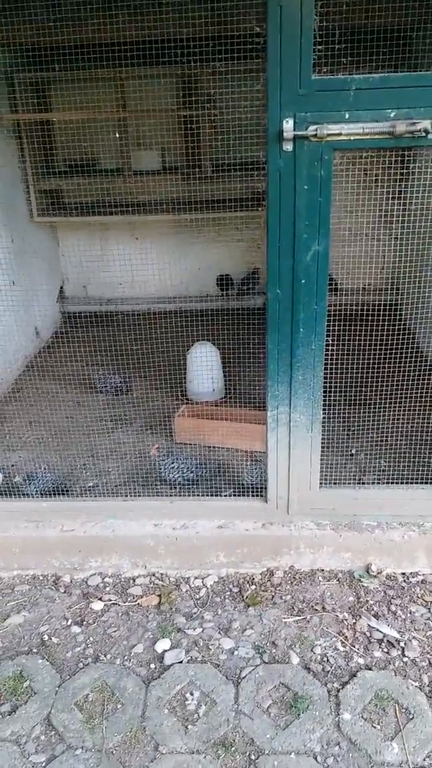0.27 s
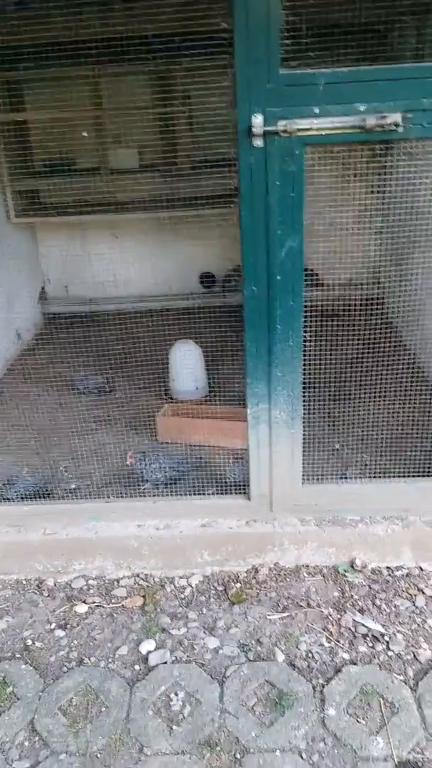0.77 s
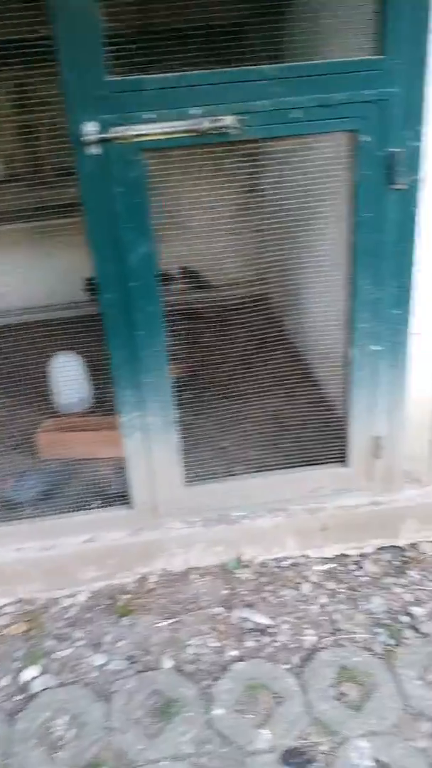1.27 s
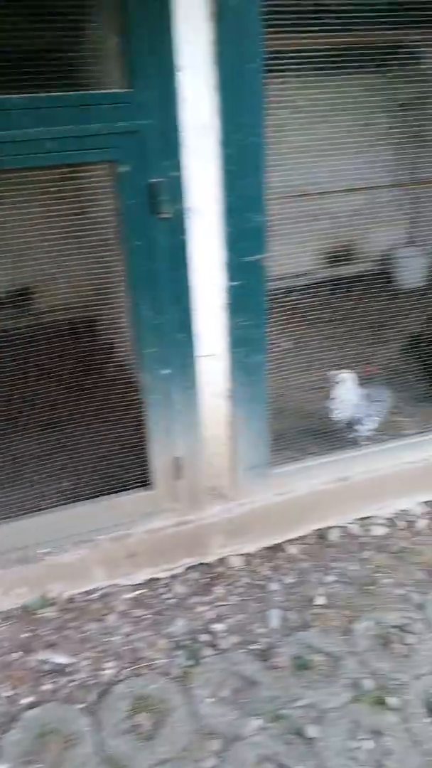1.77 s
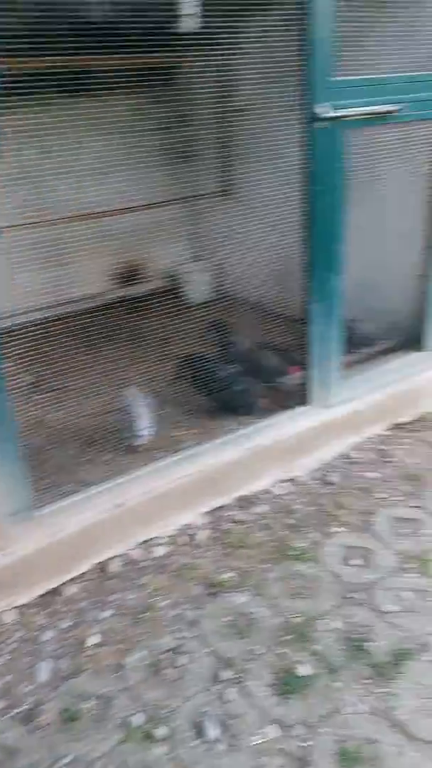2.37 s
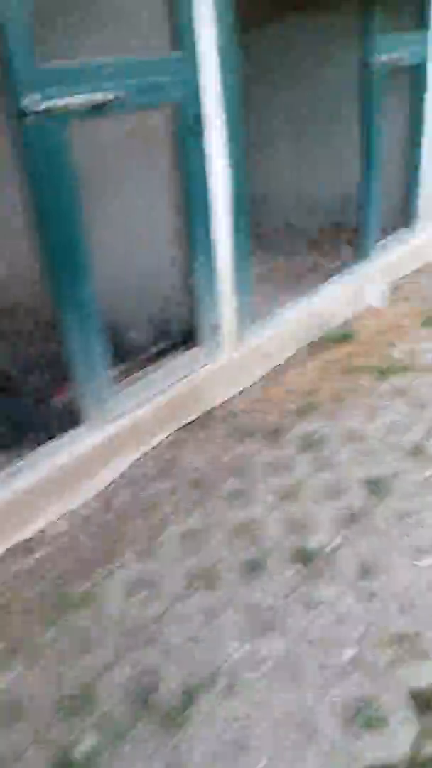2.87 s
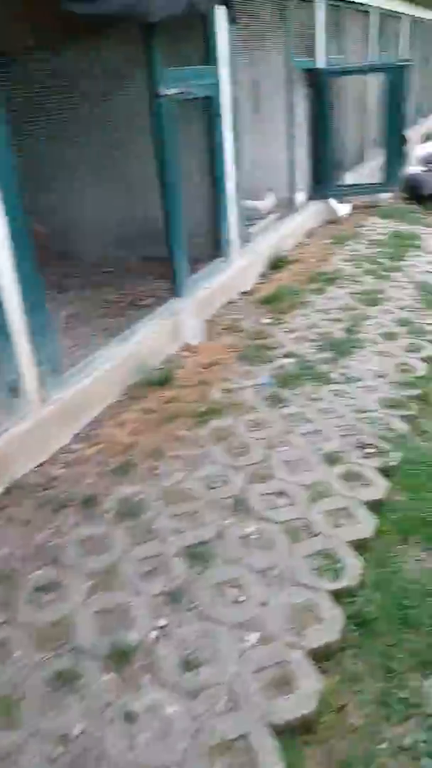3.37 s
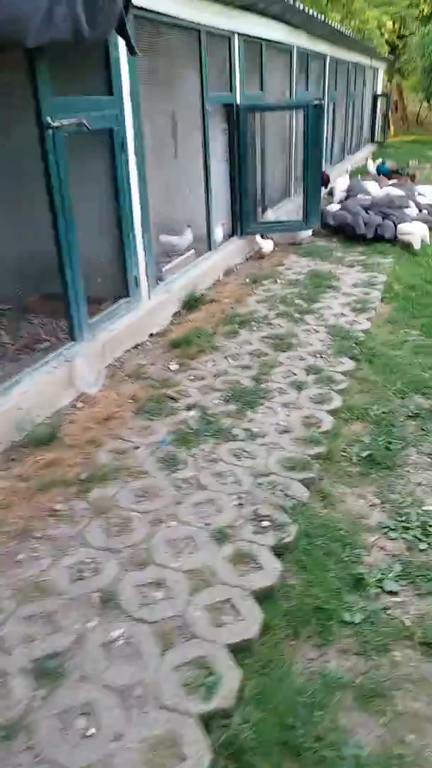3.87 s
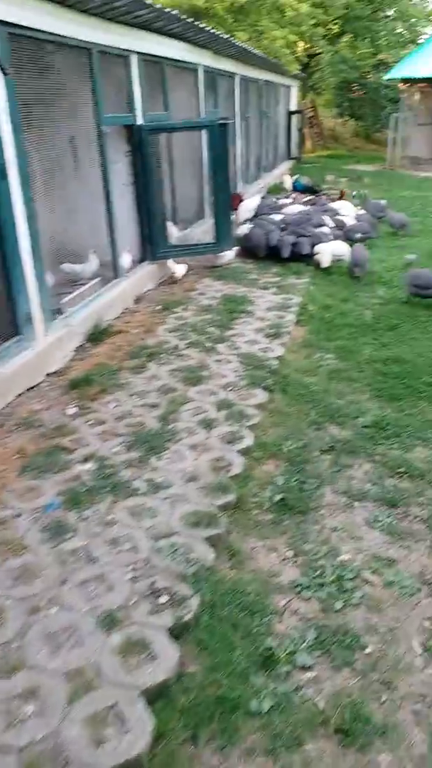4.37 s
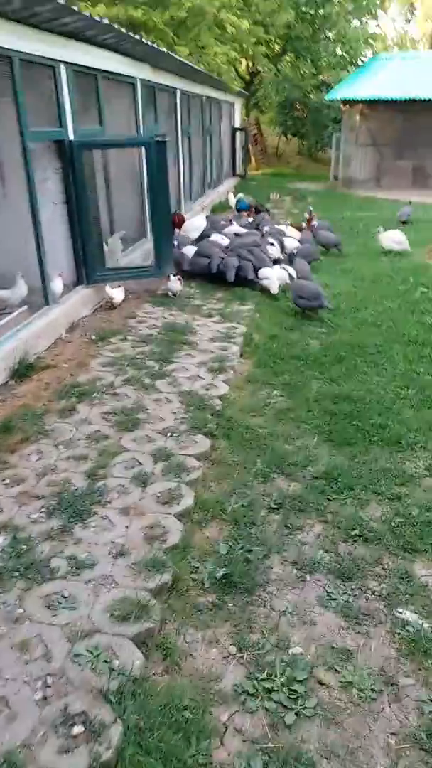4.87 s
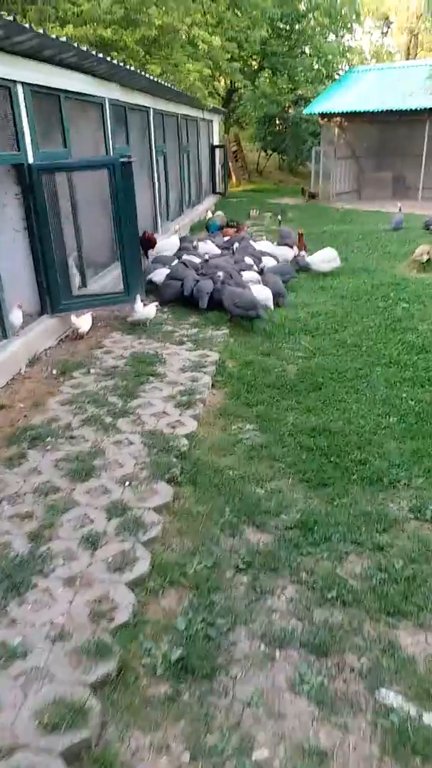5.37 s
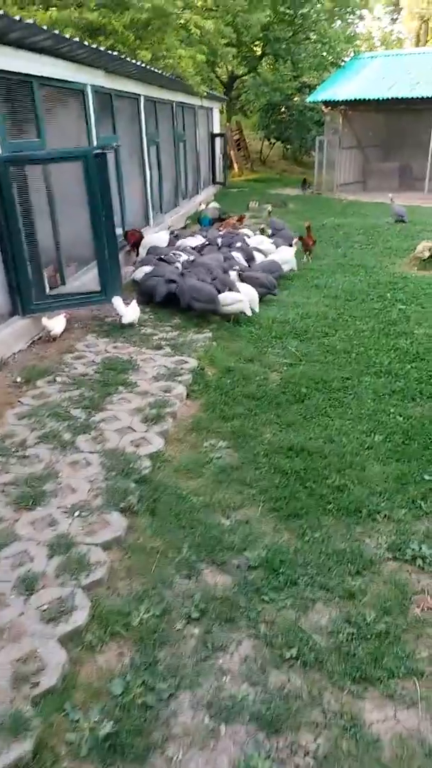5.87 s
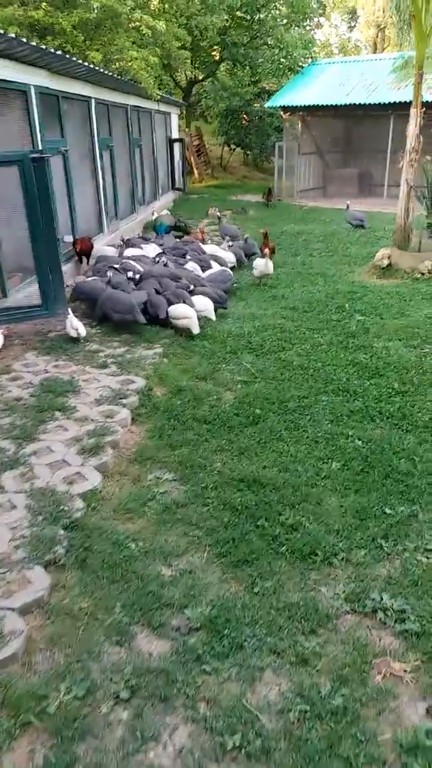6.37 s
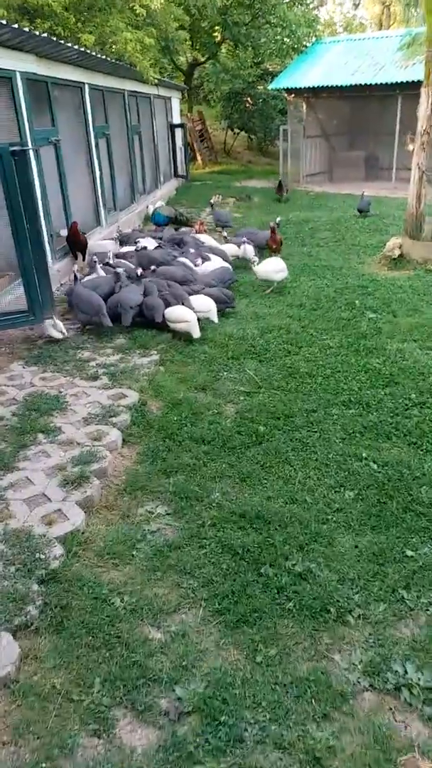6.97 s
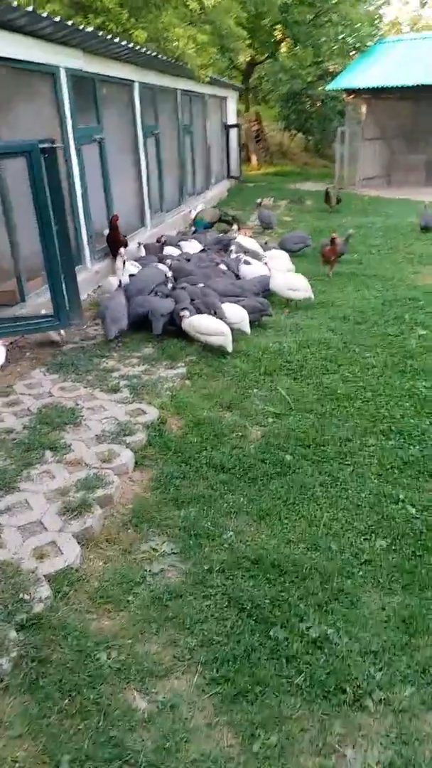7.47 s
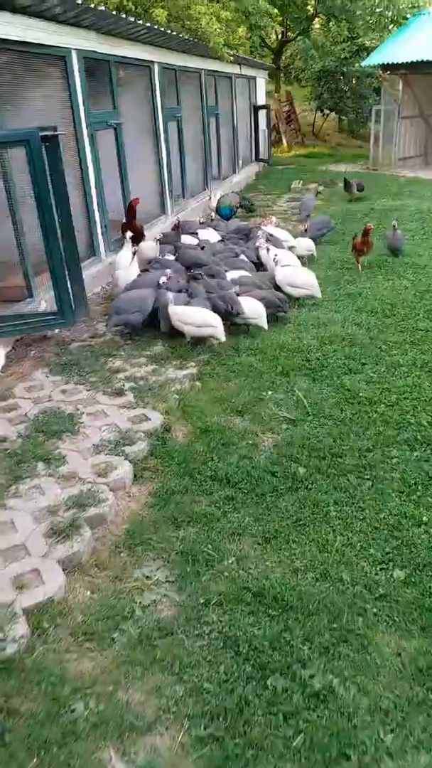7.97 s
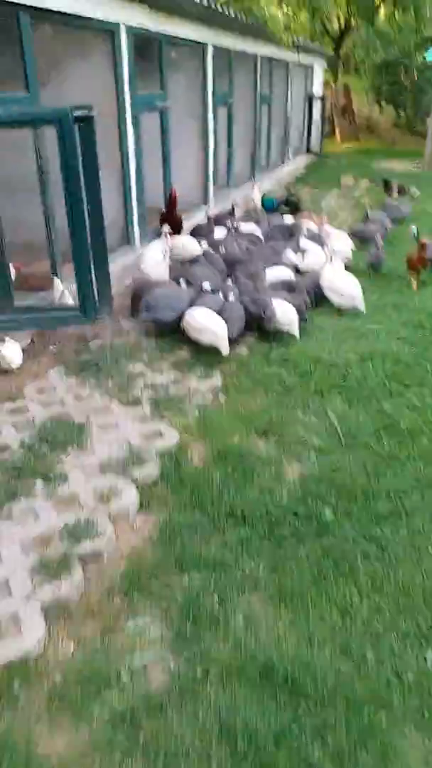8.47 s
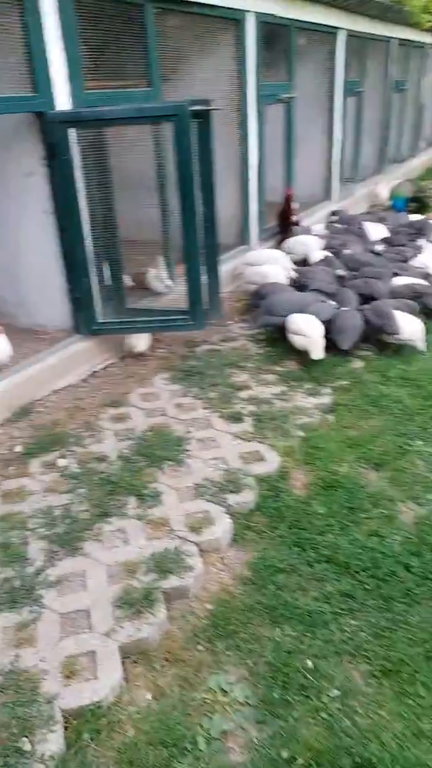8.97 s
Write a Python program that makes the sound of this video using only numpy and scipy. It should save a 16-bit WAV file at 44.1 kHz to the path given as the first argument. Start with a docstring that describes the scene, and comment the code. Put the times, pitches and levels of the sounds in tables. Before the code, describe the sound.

In a poultry yard beside walled pens, guinea fowl and chickens call over a faint, steady air hush and a fluctuating murmur of farther birds. From 0 to 1.2 s there are short bright clucks, a sharp chip near 0.4 s and dull low thuds with slight crunches. From 1.3 to 2.2 s it is sparser: chips, soft mutters, small peeps. At about 2.35 s a close bird gives a nearly pure whistle sliding upward for 0.3 s, then chips and a loud harsh squawk at 2.8-3.0 s over a clear held note. A few clucks follow, then a quieter stretch from 3.3 to 4.7 s with thin faint whines. From 5 s clucking thickens, raspy and irregular, busiest around 7.2-8 s, with chips, mutters and soft thumps, continuing to the end just past 9 s. Nearly mono handheld pickup; short wall echoes, little tail.

```python
"""A row of pens in a yard, where a mixed flock of guinea fowl and chickens clucks, rasps and chips.
Each bird is a source and filter: jittered syrinx pulses and puffs of air ring the throat resonances.
One bird close by gives a rising whistle, a nearly pure tone, then a saturated squawk over a held note.
Dull low thuds and crunchy hisses (footfalls, bumps, perhaps low clucks) are noise through filters.
Sparse random echoes from the pen walls and a faint tail answer the birds, over steady shaped air noise."""
import sys
import numpy as np
from scipy import signal
from scipy.fft import rfft, irfft, next_fast_len
from scipy.io import wavfile
from scipy.ndimage import uniform_filter1d, minimum_filter1d

SR = 44100
rng = np.random.default_rng(int(sys.argv[2]) if len(sys.argv) > 2 else 0)


def file_out(sig):
    """Save sig as 16-bit WAV at sys.argv[1]."""
    # one column per channel
    cols = np.atleast_2d(sig).T
    # limit, then scale
    lim = np.clip(cols, -1, 1)
    pcm = np.round(lim * 32767).astype(np.int16)
    wavfile.write(sys.argv[1], SR, pcm)


N = 406161  # length in samples


def amp(db):
    """Logarithmic level: converts decibels to an amplitude gain."""
    return 10 ** (np.asarray(db) / 20)


def evened(x):
    """Power normalisation: scales to unit rms."""
    return x / np.sqrt(np.mean(x ** 2) + 1e-20)


def read(points, hz):
    """Logarithmic frequency scale: interpolates a table along it."""
    f, value = np.transpose(points)
    return np.interp(np.log(hz + 1), np.log(f + 1), value)


def bins(x):
    """Discrete Fourier analysis: the frequencies in the spectrum of x."""
    return np.fft.rfftfreq(x.shape[-1], 1 / SR)


def coloured(x, points):
    """Linear filtering: multiplies the spectrum by a table of relative levels, then gives unit rms."""
    return evened(irfft(rfft(x) * amp(read(points, bins(x))), len(x)))


def resonance(x, hz, width_hz):
    """Resonance: three cascaded second-order bandpasses, each of width_hz, brought to unit rms."""
    f = bins(x) + 1
    response = 1 / (1 + 1j * (f * f - hz * hz) / (f * width_hz)) ** 3
    return evened(irfft(rfft(x) * response, len(x)))


def wander(size, hz):
    """Random modulation: noise with a Gaussian lowpass of scale hz, at unit rms."""
    x = rng.standard_normal(next_fast_len(size))
    return evened(irfft(rfft(x) * np.exp(-(bins(x) / hz) ** 2), len(x))[:size])


def add(mix, s, sound):
    """Superposition: adds a sound at a time in seconds, trimmed to the mix."""
    start = round(s * SR)
    sound = sound[max(-start, 0):]
    part = mix[max(start, 0):][:len(sound)]
    part += sound[:len(part)]


def syrinx(hz, rough, jitter=0.0465, rasp=1.0):
    """Pulsed source: jittered membrane pulses, strong and weak in turn, with air that grows in rough calls."""
    hz = hz * (1 + jitter * rough * wander(len(hz), 259))
    turns = np.cumsum(hz) / SR + rng.random()
    harmonic = np.arange(1, int(9000 / hz.mean()) + 1)[:, None]
    # random harmonic levels and phases, drawn anew for each call, smear the pulses
    size, lag = rng.standard_normal((2, 48, 1))[:, :len(harmonic)]
    pulses = (amp(3 * size) * np.cos(2 * np.pi * harmonic * turns + .9 * lag)).sum(0)
    # a half-rate modulation makes neighbouring pulses unequal
    pulses = pulses * (1 + .6 * rough * wander(len(hz), 80) * np.cos(np.pi * turns))
    puffs = (.55 + np.exp(-(turns % 1) / .3)) * rng.standard_normal(len(hz))
    share = np.clip(.12 + rasp * rough ** 2, 0, .5)
    flutter = amp((1.2 + 2.2 * rough) * wander(len(hz), 260))
    return ((1 - share) * evened(pulses) + share * evened(puffs)) * flutter


# spectrum shape of the still air: frequency_hz [Hz], relative_level_db [dB]
AIR_SPECTRUM = [(25, -29), (90, -2), (200, -11), (400, -14), (720, -29), (1020, -16), (1450, -3.5),
                (2060, -11), (2700, -3.5), (3600, -10.5), (5300, -24), (7000, -22.5), (15500, -35)]


def still_air(level_db=-63):
    """Stationary noise: a steady random hush with a fixed spectrum."""
    return amp(level_db) * coloured(rng.standard_normal(N), AIR_SPECTRUM)


# murmur of the birds farther off: time_s [s], level_db [dB, before the overall trim]
FLOCK_LEVEL = [(0, -37), (.4, -44.5), (.7, -57.5), (1.2, -50), (1.95, -60.5), (2.4, -44.5), (3.1, -41),
               (3.35, -61), (4.251, -51.5), (4.6, -75), (4.9, -44.5), (5.25, -53), (5.7, -48.5), (7.1, -48),
               (7.7, -39.5), (8.1, -52), (8.7, -44.5), (9.21, -60)]
# spectrum shape of the murmur: frequency_hz [Hz], relative_level_db [dB]
FLOCK_SPECTRUM = [(60, -44.5), (300, -14.5), (600, -21), (1000, -6.5), (1500, 1), (2000, -1.5),
                  (2800, -0.5), (4000, -10), (5200, -19.5), (8000, -34.5), (15000, -30.5)]


def flock(count=260, trim_db=-1.5):
    """Superposition of many sources: overlapping small calls merge into a murmur from birds farther off."""
    out = np.zeros(N)
    for k, (when, length, pitch, glide, rough, size) in enumerate(rng.random((count, 6))):
        swell = np.hanning(int((.03 + .06 * length) * SR))
        slide = .3 * (glide - .5) * np.linspace(0, 1, len(swell))
        hz = 380 * 2 ** (2 * pitch + .1 * (swell - 1) + slide)
        call = amp(12 * size) * swell * syrinx(hz, .25 + .4 * rough)
        add(out, (k + when) * N / SR / count - .03, call)
    level_db = np.interp(np.arange(N) / SR, *np.transpose(FLOCK_LEVEL)) + trim_db
    return amp(level_db) * coloured(evened(out), FLOCK_SPECTRUM)


# decay of the diffuse tail: frequency_hz [Hz], t60_s [s to fall by 60 dB]
TAIL_DECAY = [(200, 0.28), (1000, 0.74), (2700, 0.28), (5000, 0.28), (12000, 0.99)]


def yard(x, walls_db=-9.0, tail_db=-17, walls_s=0.054):
    """Reflection and reverberation: clustered echoes from pen walls, a faint tail from sheds and trees."""
    t = np.arange(SR) / SR
    taps = rng.standard_normal(SR) * (rng.random(SR) < 9000 / SR) * (t > .006)
    walls = rng.standard_normal(SR) * (rng.random(SR) < 1800 / SR) * (t > .005)
    walls = walls * np.exp(-(t / walls_s) ** 2)
    # each frequency of the tail decays at its own rate
    hz, at, z = signal.stft(taps, SR, nperseg=256)
    decay = amp(-60 * at / read(TAIL_DECAY, hz)[:, None])
    tail = signal.istft(z * decay, SR, nperseg=256)[1][:SR]
    echoes = amp(walls_db) * walls / np.linalg.norm(walls) + amp(tail_db) * tail / np.linalg.norm(tail)
    return signal.fftconvolve(x, echoes)[:N]


# spectrum shape of breath noise: frequency_hz [Hz], relative_level_db [dB]
BREATH_SPECTRUM = [(3500, -42.5), (5000, -26.5), (5800, 5), (8300, 5.5), (9500, -9.5), (12000, -6.5),
                   (15500, -22)]
# clucks and rasps, with some weaker returns just after loud ones:
# peak_s [s], length_s [s, swelling plus fading constants], pitch_hz [Hz, before bending],
# roughness [0-1], level_db [dB], low_db and upper_db [dB, trims of the outer throat resonances]
CLUCK_CALLS = [(.106, 0.043, 1542, 0.35, -25, -1.5, -0.5), (.187, 0.02, 295, 0.63, -37, -21, -6),
               (.217, 0.016, 1466, .6, -44, 11, 1), (.293, 0.033, 307.6, 0.52, -35, -11, -21),
               (.556, 0.039, 757, 0.24, -41, -17, -19), (.631, 0.018, 420, 0.26, -51.5, 14.5, -11),
               (0.703, 0.021, 1490, 0.26, -38.5, 9, -2), (0.76, 0.025, 1425, 0.23, -44.5, 15, 4.5),
               (.809, .017, 849, 0.58, -34.5, -16, -19), (.885, .023, 1478, 0.36, -20, 1, -7),
               (1.03, .016, 504, 0.39, -45, -8, 1.5), (1.082, .012, 952, 0.4, -27.5, -14, -5),
               (1.125, 0.058, 601, 0.64, -42.5, -5.5, -7), (1.596, 0.025, 1474, 0.52, -30.5, 0.5, 6),
               (1.662, 0.029, 552, 0.25, -31.5, -8, -2), (1.73, .06, 308, .6, -45.5, -3.5, 0),
               (1.9, .04, 493, 0.43, -52, -7, -5), (2.298, 0.023, 790, 0.51, -41, 6.5, 2),
               (3.079, 0.034, 1376, 0.28, -31.5, -4.5, -4), (3.135, 0.046, 1402, 0.35, -36.5, -16, -9),
               (3.222, .027, 1299, 0.73, -25, -15, -0.5), (3.458, 0.031, 795, 0.69, -52.5, -13.5, 3.5),
               (3.526, .036, 460.4, 0.35, -33.5, -20, 0.5), (4.06, 0.02, 467.6, 0.42, -32.5, -17.5, 6),
               (4.25, 0.029, 1403, 0.47, -42.5, -6, -6.5), (4.399, .02, 1046, 0.17, -30.5, -8, -4),
               (4.467, 0.015, 576, 0.45, -54, 10.5, 4.5), (4.782, 0.043, 524, 0.45, -38, -16, -14.5),
               (4.839, .016, 881, 0.58, -31, -21, -20), (4.857, 0.037, 1400, .6, -38, -9, -1.5),
               (4.975, 0.031, 392, 0.6, -43.5, 6.5, -26), (5.103, 0.035, 1548, 0.52, -25, -5.5, -2),
               (5.181, 0.073, 567.3, 0.57, -35, -2.5, -4.5), (5.303, .049, 410.4, 0.65, -49.5, 7.5, -26),
               (5.388, .018, 1320, 0.32, -19.5, -14, -9.5), (5.427, 0.032, 665, 0.59, -36.5, -3, -4),
               (5.521, .04, 1019, 0.52, -28, -10, 0), (5.607, 0.019, 397, 0.24, -39, -4, -5),
               (5.749, 0.015, 930, 0.42, -16, -20, -2), (5.843, 0.026, 393, .44, -34, -3.5, 4.5),
               (5.967, .036, 1340, 0.84, -28.5, -4.5, 6), (6.047, 0.058, 500, .65, -37, 5, -1.5),
               (6.277, .028, 897.5, 0.48, -22, -12, 1), (6.409, 0.025, 881, 0.23, -36.5, 3.5, -12),
               (6.515, 0.017, 897, 0.33, -28, -26, 0.5), (6.667, 0.03, 1444, 0.46, -33, -8, -1.5),
               (6.72, .026, 884, .25, -31, -9.5, -11.5), (6.808, 0.018, 912, 0.58, -18, -11.5, -3.5),
               (6.864, 0.036, 940, 0.59, -42, 2.5, 6), (7.011, 0.0095, 420, .5, -32.5, -14, -9),
               (7.068, .034, 488, .7, -30, -5, -2.5), (7.146, .016, 1266, 0.45, -26.5, -4.5, -12),
               (7.242, 0.036, 856, 0.58, -28.5, -4, 2), (7.381, 0.028, 299, .67, -20, -20, -6),
               (7.4, .032, 646, .75, -25, -8.5, -1.5), (7.456, .02, 878, .33, -20, -14, -3.5),
               (7.51, 0.039, 423, 0.57, -31, -2.5, -2.5), (7.598, 0.025, 1480, .3, -34, -1.5, -3),
               (7.742, 0.023, 688, 0.78, -28, -7, -1.5), (7.791, 0.018, 850, .2, -26.5, -8.5, -12),
               (7.84, 0.045, 288.3, 0.44, -32, -2.5, 1), (7.872, 0.046, 1454, 0.33, -34, -9, -8),
               (7.903, 0.011, 583, 0.96, -21, -10, -5), (8.216, 0.023, 819.6, 0.49, -22, -8, 0.5),
               (8.246, 0.048, 1401, 0.56, -35, -0.5, -2), (8.353, 0.027, 372, 0.63, -30.5, -2.5, -1.5),
               (8.466, 0.022, 1075, 0.082, -32.5, 2, -3), (8.494, 0.027, 284.3, 0.6, -24, -7, 0.5),
               (8.555, 0.025, 861, 0.25, -27, -5.5, 3.5), (8.681, 0.017, 1406, 0.33, -33.5, -17, -3.5),
               (8.782, 0.035, 512, 0.62, -33.5, 1.5, -14), (8.936, .022, 1250, 0.78, -28, -3, -10.5),
               (9.024, 0.01, 881, 0.32, -38.5, 8.5, -17), (9.047, 0.041, 435, 0.46, -35.5, -7, -10)]
RISE_SHARE = .46  # part of the length spent swelling
VOICE_HZ = 800  # pitch of a middling voice
LOW_HZ, MAIN_HZ, UPPER_HZ = 1426, 2736, 3935  # throat resonances of a middling voice
LOW_STRETCH, MAIN_STRETCH = 0.07, 0.067  # octaves of resonance per octave of pitch: high voices tighten it
CLUCK_ARCH = .09  # how far the pitch bows with the effort
SAG_OCT = -.07  # octaves a middling voice sags over one length; in proportion to pitch for others
GLIDE_SPREAD = 1.99  # random glide either way, octaves per s
CLUCK_HISS_DB = -23.5  # breath noise against the mean of the two outer trims


def cluck(length, pitch_hz, rough, level_db, low_db, upper_db):
    """Source-filter principle: a short syrinx burst through three throat resonances, bowing with effort."""
    rise = length * RISE_SHARE
    fall = length - rise
    t = np.arange(-2.5 * rise, 2.5 * fall, 1 / SR)
    swell = np.exp(-(t / np.where(t < 0, rise, fall)) ** 2)
    arch = 1 + CLUCK_ARCH * (swell - .85) + .012 * wander(len(t), 60)
    high = pitch_hz / VOICE_HZ
    glide = SAG_OCT * high / length + GLIDE_SPREAD * rng.uniform(-1, 1)
    drive = syrinx(pitch_hz * 2 ** (glide * t) * arch, rough)
    low = amp(low_db) * resonance(drive, LOW_HZ * high ** LOW_STRETCH, width_hz=1210)
    main = amp(2.0) * resonance(drive, MAIN_HZ * high ** MAIN_STRETCH, width_hz=1144)
    upper = amp(upper_db - 4.0) * resonance(drive, UPPER_HZ, width_hz=930)
    breath = coloured(drive + 0.41 * rng.standard_normal(len(t)), BREATH_SPECTRUM)
    hiss = amp((low_db + upper_db) / 2 + CLUCK_HISS_DB) * breath
    return t[0], amp(level_db) * swell * (low + main + upper + hiss)


# dull low thuds and crunchy hisses: time_s [s], thud_level_db [dB, before trim], resonance_hz [Hz],
# crunch_level_db [dB, before trim]
THUD_EVENTS = [(.106, -36, 314, -44.5), (.322, -44, 312, -81), (.45, -36.5, 297, -38),
               (.58, -61, 310, -55.5), (0.909, -38, 123, -44.5), (1.27, -41, 332, -80),
               (1.423, -37, 340, -63), (1.8, -49, 314, -63.5), (2.229, -62, 426, -43),
               (3.126, -46.5, 305, -81), (3.243, -46.5, 302, -41.5), (3.883, -73, 350, -51.5),
               (5.544, -44.5, 404, -49), (5.664, -41.5, 97, -77), (5.788, -38.5, 317, -55),
               (5.898, -46, 291, -67), (6.074, -39, 296, -75), (6.31, -29.5, 316, -69),
               (6.636, -46, 305, -79), (7.063, -46, 370, -60), (7.289, -34.5, 131, -75),
               (7.418, -42, 92, -54), (7.53, -61, 303, -48), (7.6, -51.5, 312, -47), (7.8, -38, 112, -73),
               (7.9, -45.5, 300, -57), (8.48, -50, 93, -42.5), (8.568, -35, 144, -64),
               (8.785, -62, 320, -49.5), (8.935, -41, 472, -64)]


def thuds(thud_db=-10, knock_db=-9, crunch_db=-2, decay_s=0.019):
    """Resonant filtering of noise: brief dull low thuds with a lighter knock, and crunchy hisses."""
    out, t = np.zeros(N), np.arange(SR // 4) / SR
    push = (t / decay_s) * np.exp(1 - t / decay_s)
    crunch_shape = [(30, -42), (100, -14.0), (500, -6), (3000, 15.5), (9000, 7), (15000, -9.0)]  # (Hz, dB)
    for s, low_db, hz, hiss_db in THUD_EVENTS:
        noise = rng.standard_normal(len(t))
        thud = resonance(noise, hz, width_hz=hz * 0.53)
        thud = thud + amp(knock_db) * resonance(noise, hz * 2.3, width_hz=hz * 1.8)
        thud = thud + 0.22 * resonance(noise, 89, width_hz=87)
        crackle = rng.standard_normal(len(t)) * amp(4 * wander(len(t), 500))
        crunch = coloured(crackle, crunch_shape)
        add(out, s - .005, push * (amp(low_db + thud_db) * thud + amp(hiss_db + crunch_db) * crunch))
    return out


# soft clucks with the beak shut: peak_s [s], pitch_hz [Hz, at the peak], level_db [dB]
MUTTER_CALLS = [(0.201, 992, -42.5), (1.13, 957, -43.5), (1.435, 803, -39.5), (1.67, 1080, -39.5),
                (1.73, 956, -48), (2.018, 807, -45), (2.145, 894, -43), (2.568, 827, -45.5),
                (2.83, 748, -45.5), (4.625, 890, -55.5), (4.715, 779, -48.5), (5.109, 877, -43.5),
                (5.42, 854, -40), (5.85, 840, -40), (6.06, 1000, -36.5), (6.152, 681, -38.5),
                (7.075, 899, -43.5), (7.148, 1130, -37.5), (7.465, 1000, -31.5), (7.66, 807, -43.5),
                (8.225, 897, -37), (8.785, 952, -36.5), (8.95, 802, -43), (9.03, 950, -37.5)]
MUTTER_S, MUTTER_ROUGH, MUTTER_WIDTH_HZ = 0.07, 1, 530
MUTTER_GLIDE_OCT_PER_S = -3


def mutter(pitch_hz, level_db):
    """Lowpass radiation: with the beak shut, little but the fundamental of a cluck gets out."""
    t = np.arange(-MUTTER_S / 2, MUTTER_S / 2, 1 / SR)
    drive = syrinx(pitch_hz * 2 ** (MUTTER_GLIDE_OCT_PER_S * t), MUTTER_ROUGH)
    return t[0], amp(level_db) * np.hanning(len(t)) ** 2 * resonance(drive, pitch_hz, MUTTER_WIDTH_HZ)


# the loud rising whistle: time_s [s], pitch_hz [Hz], level_db [dB]
RISING_NOTE = [(2.335, 1120, -54), (2.36, 1142, -26.5), (2.395, 1159, -26), (2.43, 1222, -30),
               (2.442, 1292, -13), (2.52, 1608, -13.5), (2.566, 1935, -17.5), (2.6, 2042, -20),
               (2.655, 2264, -43.5)]
# the clear note around and under the squawk: time_s [s], pitch_hz [Hz], level_db [dB]
HELD_NOTE = [(2.785, 1777, -41.5), (2.812, 1770, -23.5), (2.85, 1702, -21.5), (2.92, 1720, -24),
             (2.955, 1723, -11.5), (3.004, 1735, -12), (3.022, 1705, -28.5)]


def whistle(rows, quaver=.0067, flutter_db=1.5, overtone_db=-46):
    """Near-sinusoidal oscillation: a nearly pure note with slight frequency and amplitude modulation."""
    s, hz, db = np.transpose(rows)
    t = np.arange(s[0], s[-1], 1 / SR)
    pitch = np.interp(t, s, hz) * (1 + quaver * wander(len(t), 110))
    phase = 2 * np.pi * np.cumsum(pitch) / SR
    tone = np.sin(phase) + amp(overtone_db) * np.sin(2 * phase)
    tone = evened(tone * amp(flutter_db * wander(len(t), 110)))
    return s[0], amp(np.interp(t, s, db)) * tone * signal.windows.tukey(len(t), .1)


# thin whining peeps: start_s [s], length_s [s], first_hz and last_hz [Hz, before bowing], level_db [dB, peak]
PEEP_CALLS = [(.22, 0.3, 2734, 2690, -42), (0.481, 0.061, 1545, 1410, -35), (1.483, .1, 1673, 1820, -38.5),
              (2.214, 0.097, 1603, 1803, -32.5), (3.48, 0.16, 1500, 1360, -46),
              (3.655, 0.12, 1714, 1786, -47.5), (3.94, 0.38, 2626, 2590, -48),
              (4.237, 0.15, 3350, 3240, -47.5), (4.399, .17, 1846, 1760, -45),
              (5.203, 0.14, 1620, 1956, -38.5), (5.888, 0.1, 1730, 1770, -40.5),
              (6.645, .1, 1737, 1960, -40.5), (7.622, 0.13, 1470, 1385, -35.5),
              (7.899, .14, 1262, 1093, -45), (8.05, .14, 1774, 1980, -41), (8.596, 0.056, 3080, 2880, -43),
              (9.066, 0.27, 3050, 3130, -46.5)]
PEEP_RISE_SHARE, PEEP_FADE_DB = 0.34, -9  # part of the length spent swelling; level at either end
PEEP_ARCH = 0.011  # how far the pitch bows upwards, as a fraction


def peep(start, length, first_hz, last_hz, level_db):
    """Frequency glide: a small wavering whistle swells, slides between two pitches and fades."""
    u = np.linspace(0, 1, num=17)
    away = np.interp(u, [0, PEEP_RISE_SHARE, 1], [1, 0, 1]) ** 2
    hz = first_hz * (last_hz / first_hz) ** u * (1 + PEEP_ARCH * (.5 - away))
    rows = np.transpose([start + length * u, hz, level_db + PEEP_FADE_DB * away])
    return whistle(rows, quaver=.015, flutter_db=3.0)


# sharp chips: plunge_s [s], top_hz [Hz], level_db [dB],
# low_db and upper_db [dB, trims of the fundamental, and of the lead-in, rattle and hiss]
CHIP_CALLS = [(.442, 2325, -15, -8.5, -1.5), (1.324, 2386, -24.5, -10.5, 1), (2.205, 2030, -21.5, -4, 1),
              (2.683, 1837, -22, -4, -4), (2.799, 1968, -21, -2.5, -4.5), (5.938, 2300, -20, -10.5, -8.5),
              (6.313, 2350, -22.5, -10.5, -7), (6.951, 1690, -29.5, -13, -3), (7.218, 2250, -15.5, -15, -8),
              (7.649, 2125, -21.5, -12.5, -4.5), (8.056, 1675, -26, -4.5, -1.5),
              (8.663, 2030, -31.5, -25, -13)]
CHIP_END_HZ, CHIP_LEAD_S = 1356, .017


def chip(top_hz, level_db, low_db, upper_db, plunge_s=0.0022, rattle_db=-3, hiss_db=-29):
    """Rapid frequency sweep: a thin arched second harmonic plunges, cracks and ends in a rattle."""
    t = np.arange(-1.7 * CHIP_LEAD_S, .04, 1 / SR)
    fallen = 1 / (1 + np.exp(-(t + 0.001927) / plunge_s))  # 0 before the plunge, 1 after
    arch = 1 - 0.092 * ((np.minimum(t, 0) + CHIP_LEAD_S / 2) / CHIP_LEAD_S) ** 2
    hz = top_hz * arch * (1 - fallen) + CHIP_END_HZ * fallen
    hz = hz * (1 + (.012 + .03 * fallen) * wander(len(t), 700))
    phase = 2 * np.pi * np.cumsum(hz) / SR
    thin = np.exp(-((t + .008) / (.65 * CHIP_LEAD_S)) ** 2) * (1 - fallen)
    burst = np.exp(-((t - .002) / .0055) ** 2) * evened(amp(2 * wander(len(t), 700)))
    second = (amp(upper_db - 3) * thin + amp(5) * burst) * np.sin(2 * phase)
    first = amp(low_db + 5.5) * burst * fallen * np.sin(phase)
    ragged = resonance(syrinx(np.full(len(t), CHIP_END_HZ), rough=.7), 3600, width_hz=2000)
    rattle = amp(upper_db + rattle_db) * np.exp(-((t - .012) / .013) ** 4) * ragged
    hiss = amp(upper_db + hiss_db) * burst * coloured(rng.standard_normal(len(t)), BREATH_SPECTRUM)
    return t[0], amp(level_db) * (first + second + rattle + hiss)


# throat of the squawking bird: frequency_hz [Hz], relative_level_db [dB]
THROAT_SPECTRUM = [(300, -64), (550, -62), (800, -6.5), (1200, -12), (1550, -10), (1950, -1.5), (2800, -3),
                   (3300, -5), (3900, -17), (4700, -17.5), (6000, -27.5), (9000, -34), (15000, -24)]
SQUAWK_AT_S, SQUAWK_HZ, SQUAWK_DB = 2.861, 577.4, -10
SQUAWK_ATTACK_S, SQUAWK_HOLD_S, SQUAWK_RELEASE_S = .022, .055, .042


def squawk(bend=.08):
    """Nonlinear saturation: a hard-driven, heavily jittered syrinx clips softly; pitch follows effort."""
    corners = np.cumsum([0, SQUAWK_ATTACK_S, SQUAWK_HOLD_S, SQUAWK_RELEASE_S])
    effort = np.interp(np.arange(0, corners[-1], 1 / SR), corners, [0, 1, 1, 0])
    hz = SQUAWK_HZ * (1 + bend * (effort - 1))
    voice = syrinx(hz, rough=.62, jitter=.16)
    drive = np.tanh(1.5 * resonance(voice, 2300, width_hz=4000))
    return SQUAWK_AT_S, amp(SQUAWK_DB) * effort * coloured(drive, THROAT_SPECTRUM)


def scene(ground_db=-15, wall_db=-11, shed_db=-25, shed_s=0.14, width_db=-27):
    """Early reflection: clucks, chips and mutters bounce off ground and wall; the layers are summed."""
    birds, notes = flock(), np.zeros(N)
    for voice, table in ((cluck, CLUCK_CALLS), (chip, CHIP_CALLS), (mutter, MUTTER_CALLS)):
        for s, *row in table:
            lead, sound = voice(*row)
            ground_s, wall_s = rng.uniform([.0005, .012], [.002, .028])
            for delay, db in ((0, -.5), (ground_s, ground_db), (wall_s, wall_db)):
                add(birds, s + lead + delay, amp(db) * sound)
    for row in PEEP_CALLS:
        add(notes, *peep(*row))
    for curve in (RISING_NOTE, HELD_NOTE):
        add(notes, *whistle(curve))
    s, cry = squawk()
    add(notes, s, cry)
    add(birds, s + shed_s, amp(shed_db) * cry)  # only the loud squawk comes back from the far shed
    to_walls = birds + .85 * notes
    mono = birds + notes + yard(to_walls) + thuds() + still_air()
    apart = amp(width_db) * yard(to_walls)  # the echoes reach the two ports slightly differently
    return np.array([mono + apart, mono - apart])


# balance of the two microphone ports: frequency_hz [Hz], left_minus_right_db [dB]
PORT_BALANCE = [(100, -1), (2400, 0), (3000, 0.62), (3500, -1.5), (4200, -3), (5200, -5.5), (6500, 0.5),
                (15000, -0.5)]
EDGE_HZ = 15800  # upper band limit


def record(dry):
    """Spectral balance, peak limiting and band limiting: tilts the ports, holds peaks, cuts the top."""
    tilt = amp(read(PORT_BALANCE, bins(dry)) * np.array([[.5], [-.5]]))
    ports = irfft(rfft(dry) * tilt, N)
    headroom = .98 / np.maximum(abs(ports).max(0), .98)
    ports = ports * uniform_filter1d(minimum_filter1d(headroom, size=121), size=121)
    lowpass = signal.firwin(511, EDGE_HZ, window=("kaiser", 9), fs=SR)
    return signal.oaconvolve(ports, lowpass[None], "same")


dry = scene()
out = record(dry)
file_out(out)
```